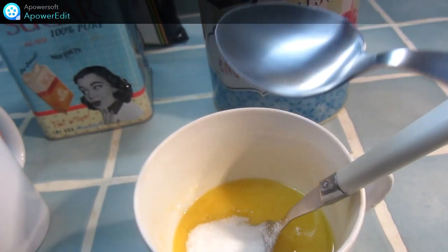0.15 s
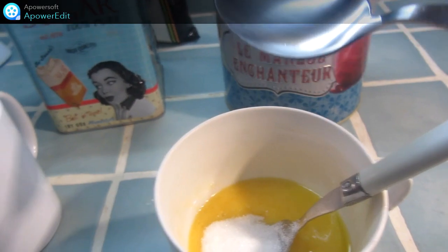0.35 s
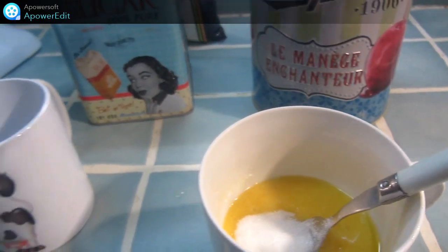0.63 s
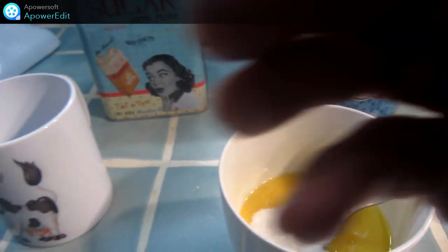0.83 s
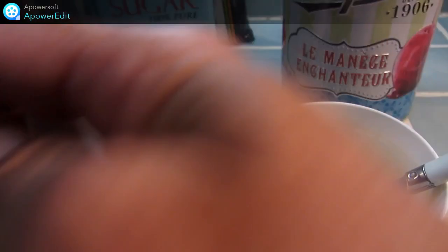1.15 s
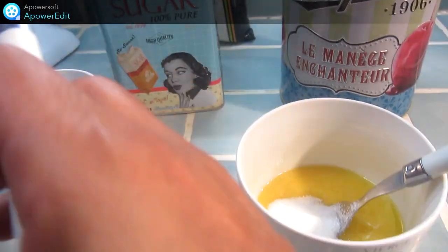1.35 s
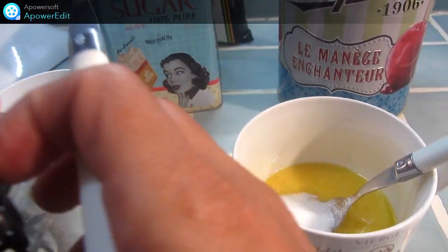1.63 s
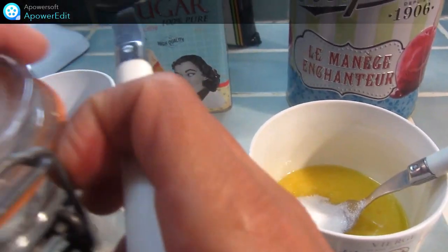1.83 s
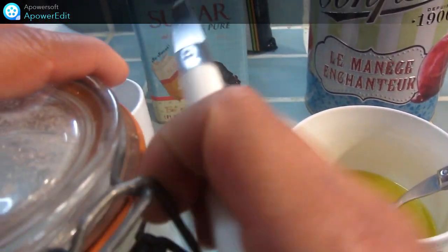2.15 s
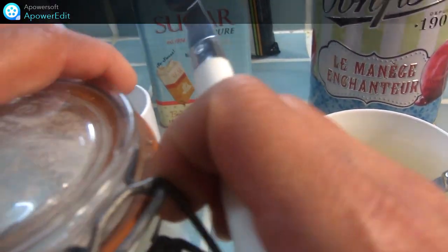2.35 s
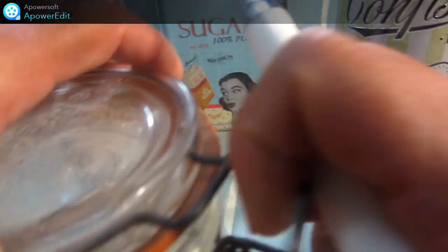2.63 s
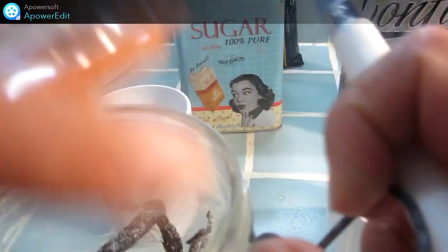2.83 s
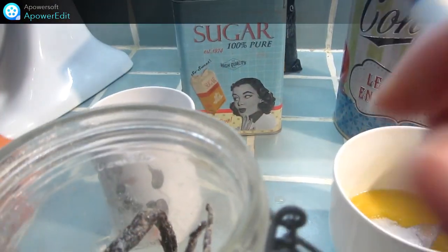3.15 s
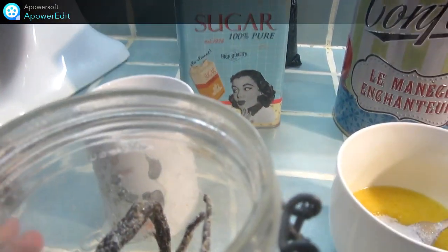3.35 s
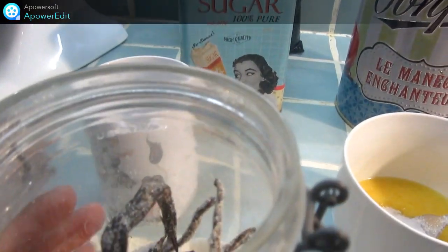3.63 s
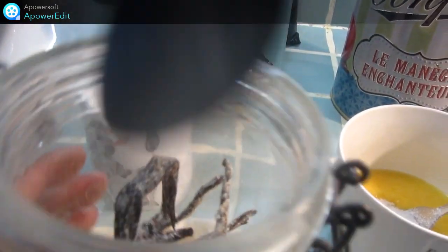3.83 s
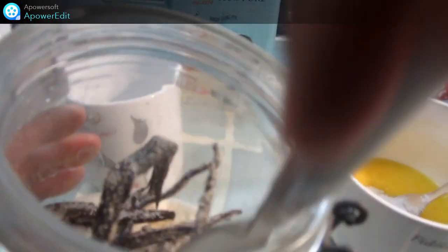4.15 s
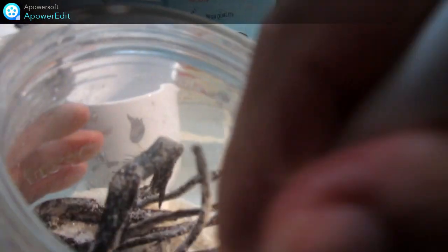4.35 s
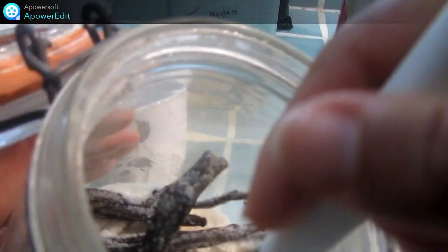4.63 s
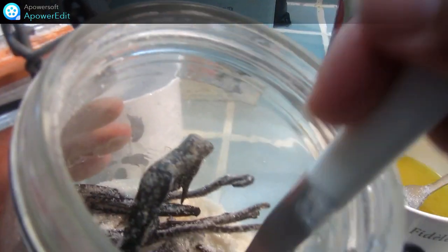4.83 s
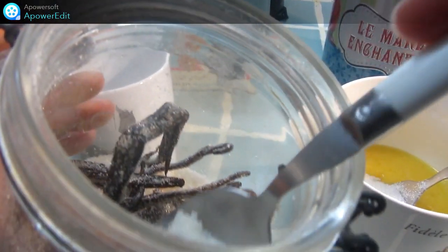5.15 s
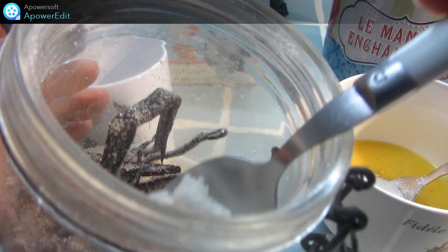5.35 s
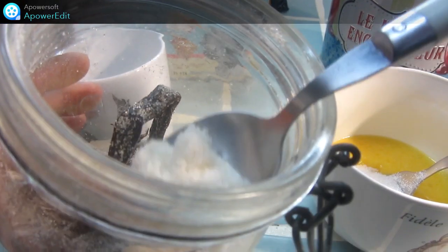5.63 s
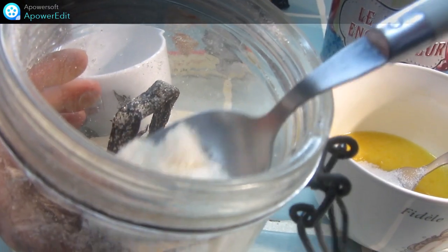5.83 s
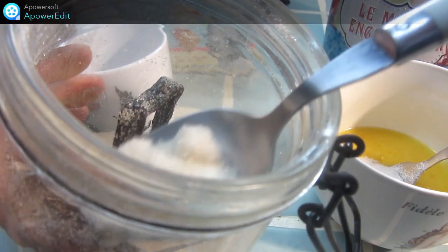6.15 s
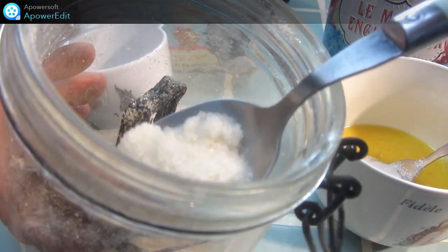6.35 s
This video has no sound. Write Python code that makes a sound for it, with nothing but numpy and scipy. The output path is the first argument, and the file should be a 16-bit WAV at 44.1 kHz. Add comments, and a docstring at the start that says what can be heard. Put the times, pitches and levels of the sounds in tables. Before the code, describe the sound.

Close kitchen handling: hollow glass thuds, a snapping wire clasp, jingling hinge, steel spoon crunching through sugar, four bright taps on the rim.

```python
"""A tiled kitchen, close to the microphone: a glass sugar jar is handled, its wire clasp snaps open, the hinged
lid swings back and knocks on the glass. A steel spoon clinks in, digs through the sugar and raps the rim.
Hard contacts are a crack, a noise cloud and ringing modes; rubs, hisses, grit and crunches are random slips
through colour filters. A small hard room echoes them, over still air and two faint hum tones that beat."""
import sys
import numpy as np
from scipy import signal
from scipy.fft import rfft, irfft
from scipy.io import wavfile

SR = 44100
rng = np.random.default_rng(int(sys.argv[2]) if len(sys.argv) > 2 else 0)


def wav_out(sig):
    """Save sig, one row per channel (or a flat mono array), as 16-bit PCM at SR to the path in sys.argv[1]."""
    wavfile.write(sys.argv[1], SR, np.round(np.clip(np.atleast_2d(sig).T, -1, 1) * 32767).astype(np.int16))


N = 285768
TIME = np.arange(N) / SR

# ringing modes of the wire clasp, also heard in the light ticks: [f/Hz, relative level/dB, t60/s]
CLASP_RING = [(865, 0.5, 0.2), (2705, -2, 0.059), (4400, 1.5, 0.023), (5450, -27.5, .035),
              (6120, 0.5, 0.043), (7070, -6.5, .05), (8900, -14.5, 0.042)]
# blows of the hinge wire: [t/s, relative level/dB, brightness/(dB per octave), left minus right/dB]
HINGE_BLOWS = [(3.149, -37.5, -3, -2), (3.157, -39, -0.5, -2), (3.1841, -18, -0.5, 0.5),
               (3.193, -13, -10, 6.5), (3.194, -8, 1.5, -3.5), (3.208, -22.5, -5, -1.5),
               (3.223, -19.5, 0.5, 1.5), (3.342, -20.5, -1, -1.5)]
# colour of the hinge wire's contact: [f/Hz, level/dB]
HINGE_SPECTRUM = [(240, -42.5), (400, -11.5), (588, -17.5), (1040, -34.5), (1790, 0), (2750, -18.5),
                  (3020, -7.5), (3810, -13.5), (4440, 3), (5190, -3.5), (6340, -0.5), (6950, -6),
                  (9470, -5.5), (16000, -27)]


def undb(db):
    """Decibels to gain."""
    return 10 ** (np.asarray(db) / 20)


def unit(x):
    """Scale to rms 1."""
    return x / np.sqrt(np.mean(x ** 2) + 1e-20)


def pan(db):
    """Left and right gains for a level difference (left minus right, dB), at constant power."""
    gains = undb(np.array([[db], [-db]]).reshape(2, -1) / 2)
    return gains / np.sqrt(np.mean(gains ** 2, axis=0))


def pair(size, spread):
    """Stereo noise with a shared part; spread is the side share."""
    mid, side = rng.standard_normal((2, size))
    return unit(np.array([mid + spread * side, mid - spread * side]))


def colour(x, points, tilt_db=0, size=4096):
    """Causal minimum-phase filter through (Hz, dB) points, tilted in dB per octave about 2 kHz."""
    hz, db = np.transpose(points)
    octave = np.log2(np.maximum(np.arange(size // 2 + 1) * SR / size, 1))
    tilt = tilt_db * np.clip(octave - 11, -4, 3)
    gain_db = np.interp(octave, np.log2(hz), db) + tilt
    # folding the cepstrum forward makes the response causal
    cepstrum = irfft(np.log(undb(gain_db)))
    cepstrum[1:size // 2] *= 2
    cepstrum[size // 2 + 1:] = 0
    response = irfft(np.exp(rfft(cepstrum)))
    return signal.fftconvolve(x, response[None], axes=1)[:, :x.shape[1]]


def fade(t, t60):
    """Exponential decay by 60 dB in t60 seconds."""
    return np.exp(-np.log(1000) * t / t60)


def walk(rate):
    """Smooth random wandering, spread near 1, with rate turning points per second."""
    knots = rng.standard_normal(2048)
    return np.interp(TIME * rate, np.arange(len(knots)), knots)


def swell(s, db, rise, hold, fall):
    """Gain of one movement: it grows by 60 dB over rise up to s, holds, and dies by 60 dB over fall."""
    early = np.maximum(s - TIME, 0)
    late = np.maximum(TIME - s - hold, 0)
    return undb(db - 60 * np.minimum(early / rise + late / fall, 2))


def grains(rate, scatter_db, spread):
    """Random tiny slips of unequal size, rate per second on average."""
    chance = rng.random(N)
    size = np.minimum(rng.exponential(size=N), 4)
    return unit(pair(N, spread) * (chance < rate / SR) * undb(scatter_db * size))


def sized(x):
    """Scale each channel to rms 1 over its first 8 ms."""
    attack = int(.008 * SR)
    return x / np.sqrt(np.mean(x[:, :attack] ** 2, axis=1, keepdims=True))


def strike(blows, points, modes, level_db, crack_db, ring_db, clatter_t60, spread, port_phase):
    """Each blow is a crack, a dense cloud of short-lived noise and a few lasting modes."""
    out, t = np.zeros((2, N + SR)), np.arange(SR // 2) / SR
    for s, db, bright_db, pan_db in blows:
        cloud = sized(colour(pair(len(t), spread) * fade(t, clatter_t60), points, bright_db))
        click = np.array([t == 0, t == 0]) * 1.
        crack = sized(colour(click, points, bright_db))
        ring = 0
        for hz, mode_db, t60 in modes:
            # the place of contact changes how strongly a mode rings; the two ports hear it out of step
            weight, turn = rng.standard_normal(2)
            lead = np.array([[1], [-1]]) * (port_phase + spread * turn / 2) / 2
            build_up = 1 - np.exp(-(2 * hz * t) ** 2)  # a mode builds up over its first cycle
            tone = np.sin(2 * np.pi * hz * t + lead)
            ring = ring + undb(mode_db + weight) * build_up * fade(t, t60) * tone
        blow = sized(cloud + undb(crack_db) * crack + undb(ring_db) * sized(ring))
        start = int(s * SR)
        out[:, start:start + len(t)] += undb(db + level_db) * pan(pan_db) * blow
    return out[:, :N]


def background():
    """Still kitchen air; an appliance motor beats slowly against the mains hum."""
    # colour of the kitchen air: [f/Hz, level/dB]
    air_colour = [(15, -61), (25, -26.5), (48, -12.5), (76, -2.5), (102, 5.5), (195, -8.5), (373, -6.5),
                  (516, -14), (624, -11.5), (1160, -20.5), (2840, -27), (4140, -35.5), (6560, -29.5),
                  (8830, -37), (16000, -50)]
    motor_hz, mains_hz, lull_s = 98.62, 100.01, .13  # the first lull of the beat falls at lull_s
    motor_db, mains_db = -59.5, -57.5  # levels at the start
    fading_db_per_s = 0.5  # the hum slowly grows fainter

    def tone(hz):
        return np.sqrt(2) * np.sin(2 * np.pi * hz * (TIME - lull_s))

    beat = undb(motor_db) * tone(motor_hz) - undb(mains_db) * tone(mains_hz)
    hum = beat * undb(-fading_db_per_s * TIME)
    air = unit(colour(pair(N, spread=1.0), air_colour)) * undb(-55.5 + 0.15 * walk(1.7))
    return air + pan(-3.0) * hum


def hands():
    """Fingers stick and slip on the jar: a hollow rumble set by the lid's state, a dry rub above it."""
    # finger strokes: [t/s, relative pressure level/dB, rise/s, hold/s, fall/s,
    # relative skin friction level/dB, left minus right/dB]
    strokes = [(0.757, -58, .35, 0.89, 0.42, -64.5, -1.5), (0.865, -28.5, 0.14, 0.029, 0.21, -43.5, 1),
               (1.687, -35.5, .04, 0.0087, 0.52, -48.5, -0.5), (1.918, -55.5, 0.46, 0.25, 0.65, -61, 0),
               (2.322, -39, 0.029, .01, 0.11, -56, 1), (2.808, -33, 0.07, 0.0061, 0.2, -44, 1),
               (2.9, -40.5, .2, 0.026, 0.41, -46.5, -1), (3.035, -46, .05, 0.0087, 0.43, -66, 4),
               (3.22, -39.5, 0.53, 0.0093, 0.33, -44, -1.5), (3.322, -47, 0.09, .01, 0.61, -54.5, -2),
               (3.62, -38, 0.12, 0.067, 0.48, -45, -3), (3.746, -46, 0.14, 0.0088, 0.096, -43, 0),
               (3.868, -29, 0.23, 0.013, 0.18, -46.5, -2.5), (3.961, -32, 0.28, 0.012, 0.26, -40, -0.5),
               (4.033, -30.5, 0.23, 0.061, 0.06, -50.5, -0.5), (4.445, -49.5, 0.58, 0.17, 0.4, -61.5, -0.5),
               (4.712, -38.5, 0.21, 0.016, 0.12, -52, -3), (4.998, -36, 0.63, 0.039, 0.34, -50.5, -1.5),
               (5.083, -34.5, 0.094, 0.021, 0.14, -51.5, -1), (5.181, -37, 0.23, 0.029, 0.84, -52, -0.5),
               (5.652, -46.5, 0.035, 0.0056, 0.077, -70, -4)]
    # skin rubbing on glass: [f/Hz, level/dB]
    skin_colour = [(290, -31), (500, 0), (585, 1), (622, -23), (949, -4), (1350, -12.5), (1820, -12),
                   (3220, -23), (5100, -31.5), (5620, -27.5), (9000, -37.5), (11700, -70), (19800, -120)]
    # hollow colour of the jar shut on the counter, with the lid swinging, open in the hand: [f/Hz, level/dB]
    shut_colour = [(35, -53), (60, -20), (87, -2), (204, 6), (296, 7), (359, 8), (403, -5.5), (592, -1),
                   (777, -11), (900, -2), (1170, -44.5), (1980, -120)]
    swinging_colour = [(35, -37), (60, -21.5), (168, -9), (226, -8), (321, -1), (389, -13), (466, -0.5),
                       (559, -15.5), (633, -19.5), (900, -20), (1170, -42), (1980, -120)]
    held_colour = [(35, -22), (60, -26), (118, -1), (199, 3.5), (265, 0), (321, 10.5), (398, -9), (461, 0),
                   (572, -9.5), (633, -18), (900, -14), (1170, -33.5), (1980, -120)]
    unlatched_s, lifted_s = 2.7, 3.82  # the lid comes free, then the open jar is lifted

    slips = walk(70)
    skin = grains(rate=2500, scatter_db=-1.5, spread=0.59)
    rub = unit(colour(skin, skin_colour)) * undb(2.0 * slips)
    friction = grains(rate=1200, scatter_db=1.0, spread=0.32)
    unsteady = undb(-1.5 + 2.5 * slips)
    shut = unit(colour(friction, shut_colour)) * unsteady
    swinging = unit(colour(friction, swinging_colour)) * unsteady
    held = unit(colour(friction, held_colour)) * unsteady
    out = 0
    for s, press_db, rise, hold, fall, rub_db, pan_db in strokes:
        rumble = shut if s < unlatched_s else swinging if s < lifted_s else held
        stroke = rumble + rub * undb(rub_db - press_db)
        out = out + pan(pan_db) * swell(s, press_db, rise, hold, fall) * stroke
    return out


def fine_hisses():
    """Fine dry hisses of many tiny slips; sparser crunches among them also ring the glass wall."""
    # fingers brushing the jar, later sugar sliding: [t/s, relative level/dB, rise/s, hold/s, fall/s]
    brushes = [(0.834, -64, 0.36, .01, 1.3), (1.405, -64.5, 0.033, 0.011, 1), (1.66, -69, 0.17, 0.35, 0.32),
               (1.93, -62, 0.1, 0.0045, 0.058), (3.872, -47, 0.096, 0.0087, 0.093),
               (3.967, -45.5, 0.078, 0.0065, 0.04), (4.182, -49.5, .05, 0.05, 0.1),
               (4.324, -47.5, 0.032, 0.0047, 0.91), (4.569, -43, 0.19, 0.013, 0.52),
               (4.766, -62.5, .06, 0.057, 0.9), (4.976, -61.5, 0.23, 0.14, .3),
               (5.2, -67.5, 0.087, .12, 0.25), (5.365, -61.5, .03, .05, 0.91)]
    # colour of the hiss: [f/Hz, level/dB]
    hiss_colour = [(710, -29), (1200, -17), (1830, -7), (2400, -10), (3250, -2.5), (3660, -9), (5780, -4.5),
                   (8910, -6.5), (13200, -21.5), (15000, -20.5), (16000, -22)]
    # the buried spoon keeps the wall ringing faintly until lifted out: [t/s, level/dB, rise/s, hold/s, fall/s]
    dig = (4.4, -62, .2, .9, .45)
    wall_hz, wall_q = 1781, 68  # lowest ring of the glass wall and its quality factor

    hiss = unit(colour(grains(rate=4500, scatter_db=1.5, spread=0.35), hiss_colour))
    crunch = grains(rate=85, scatter_db=1, spread=0.53)
    peak_b, peak_a = signal.iirpeak(wall_hz, wall_q, fs=SR)
    wall = unit(signal.lfilter(peak_b, peak_a, crunch))
    flow = sum(swell(*brush) for brush in brushes)
    texture = hiss + undb(-9.0) * unit(colour(crunch, hiss_colour))
    uneven = undb(-1.0 + 3.0 * walk(45))
    return flow * texture * uneven + swell(*dig) * wall


def ticks():
    """Fingers and wire tick lightly: short noise clouds with a weak ring of the clasp's modes."""
    # light ticks: [t/s, relative level/dB, brightness/(dB per octave), left minus right/dB]
    tick_blows = [(1.301, -33, 1, 0), (1.36, -37.5, -2, -1), (1.403, -33, 3, -0.5), (1.424, -34.5, -3, 0),
                  (2.441, -35, -0.5, -5), (2.483, -36, 2, 5), (2.498, -33, 3, -1), (3.911, -30, -1, 2),
                  (3.956, -20.5, -6.5, 1)]
    # colour of the contact: [f/Hz, level/dB]
    tick_colour = [(240, -9), (400, 7.5), (880, 4), (1370, 1.5), (2060, 3), (3390, -14), (6510, -15.5),
                   (15000, -37)]
    return strike(tick_blows, tick_colour, CLASP_RING, level_db=-7.5, crack_db=-8, ring_db=-24.0,
                  clatter_t60=0.024, spread=0.7, port_phase=0)


def drag(judder_hz=143):
    """The jar's foot judders over the tiles: glass catches and lets go, a burst of grit with every slip."""
    # one drag just after the first bump: [t/s, relative level/dB, rise/s, hold/s, fall/s]
    movement = (1.708, -36, .06, .066, .15)
    # grit between glass and tile: [f/Hz, level/dB]
    grit_colour = [(60, -6.5), (145, 3), (370, 0), (520, -22), (900, -14), (1250, -7), (1650, -16),
                   (2250, -8.5), (2850, -17), (4100, -25), (5000, -42), (9000, -68)]
    phase = np.cumsum(judder_hz * (1 + 0.065 * walk(60))) / SR  # in cycles
    burst = np.exp(-(phase % 1) / .5)
    slips = grains(rate=9000, scatter_db=0, spread=.5) * burst
    grit = undb(-2.5) * unit(colour(slips, grit_colour))
    judder = undb(1) * np.sin(2 * np.pi * phase)
    return swell(*movement) * (grit + judder)


def thuds():
    """Soft bumps on jar and counter sound the jar's air at a hollow pitch, with a counter resonance."""
    # bumps: [t/s, relative level/dB, brightness/(dB per octave), left minus right/dB, hollow pitch f/Hz]
    bumps = [(1.666, -18, 1, -4.5, 141), (1.943, -34, -12.5, -6.5, 139), (2.165, -13.5, 0, -3.5, 386.5),
             (2.501, -26, -3.5, -6, 334), (2.527, -21.5, 1, 2.5, 461), (2.528, -11.5, -0.5, 1.5, 371),
             (2.537, -18, 3, 0, 274), (2.614, -29.5, 3, -3.5, 122), (2.816, -25.5, 4.5, -5, 306),
             (3.157, -32, 9, 12, 516), (3.195, -24.5, 4, 1, 502), (3.519, -20.5, 1, 2, 457),
             (3.616, -23.5, 9, 11, 462), (3.688, -21.5, 4, 4, 458), (3.913, -19, 1.5, 3, 135),
             (3.956, -18.5, 2.5, -3, 334), (4.033, -19, 2, 1, 181), (4.267, -20.5, 4.5, -1.5, 542),
             (4.713, -35.5, -0.5, 6, 196), (5.094, -24, -9, -4, 300), (5.111, -36, -7, 1, 245),
             (5.233, -26, -7, 3, 229)]
    # colour of the contact: [f/Hz, level/dB]
    thud_colour = [(41, -27), (70, -14), (284, 4.5), (420, 0.5), (508, 1), (663, -9), (1760, -24),
                   (2020, -36), (2190, -31.5), (3000, -40), (3900, -71.5), (6600, -120)]
    # counter resonance: [f/Hz, relative level/dB, t60/s]
    counter_mode = (140, -15, 0.3)
    hollow_t60 = 0.097  # s
    out = 0
    for *blow, hz in bumps:
        modes = [(hz, 0, hollow_t60), counter_mode]
        out = out + strike([blow], thud_colour, modes, level_db=-8.5, crack_db=-1, ring_db=3.0,
                           clatter_t60=0.12, spread=0.59, port_phase=0.17)
    return out


def clasp():
    """The wire clasp snaps: a short clatter over the ringing modes of the wire."""
    # snaps: [t/s, relative level/dB, brightness/(dB per octave), left minus right/dB]
    snaps = [(2.2120, -37, -4, 2), (2.2303, -5.5, -5, 0.8), (2.2333, -8.5, 2.5, -3),
             (2.4885, -29, -5.5, -3.5), (2.5150, -22, -3, 2), (2.5292, -13.5, -4.5, -2.4),
             (2.5600, -23.5, -2, 1), (2.5632, -8, 1, -3), (2.5650, -14.5, 0, 11.5),
             (2.8598, -39.5, -0.5, -4), (3.0873, -41, -0.5, 4.6)]
    # colour of the contact: [f/Hz, level/dB]
    clasp_colour = [(120, -49), (200, -7.5), (851, -4), (1350, -6), (1620, 0), (2750, 1.5), (3620, -5),
                    (4600, -1.5), (4860, -2.5), (5230, -2.5), (9400, -7.5), (12200, -23.5), (14300, -21),
                    (16000, -32)]
    return strike(snaps, clasp_colour, CLASP_RING, level_db=-12.0, crack_db=-8.0, ring_db=-12,
                  clatter_t60=0.021, spread=.4, port_phase=.3)


def crunching_bed():
    """A faint, coarse crunching bed under the handling and digging: sparse slips of very unequal size."""
    # its one long swell: [t/s, relative level/dB, rise/s, hold/s, fall/s]
    bed = (3.5, -64, 0.6, 1.7, 0.5)
    # colour of the crunching: [f/Hz, level/dB]
    crunch_colour = [(500, -22.5), (1000, 1.5), (1400, -5.5), (1850, 13), (2400, 0.5), (3200, -11),
                     (5000, -23), (9000, -21.5)]
    crunches = unit(colour(grains(rate=1500, scatter_db=7.5, spread=0.75), crunch_colour))
    return swell(*bed) * crunches * undb(2 * walk(55))


def hinge():
    """The hinge wire jingles: each blow rings many high modes of the wire."""
    # ringing modes of the wire: [f/Hz, relative level/dB, t60/s]
    wire_modes = [(1730, -0.5, 0.045), (4140, -13.5, .08), (5000, -12, 0.06), (5600, -0.5, 0.053),
                  (6740, -5, 0.11), (6800, -2, .08), (7300, -13, 0.1), (7800, -9.5, 0.077), (9140, -3, .09),
                  (10370, -18, .13), (13100, -12.5, 0.061), (14100, -14, 0.14)]
    return strike(HINGE_BLOWS, HINGE_SPECTRUM, wire_modes, level_db=-7.0, crack_db=-28, ring_db=-9.5,
                  clatter_t60=0.027, spread=0.66, port_phase=0.4)


def rattle(level_db=-22, t60=0.23):
    """The loose hinge wire chatters on after each blow in random small contacts that die away."""
    energy = 0
    for s, db, _, _ in HINGE_BLOWS:
        energy = energy + ((TIME >= s) * undb(db) * fade(np.abs(TIME - s), t60)) ** 2
    chatter = unit(colour(grains(rate=430, scatter_db=4.5, spread=0.99), HINGE_SPECTRUM))
    return chatter * np.sqrt(energy) * undb(level_db)


def lid():
    """The heavy glass lid touches, then lands against the jar, ringing its modes."""
    # contacts: [t/s, relative level/dB, brightness/(dB per octave), left minus right/dB]
    landings = [(3.5042, -27.5, 6, 2), (3.5192, -5, 0.5, -2)]
    # colour of the contact: [f/Hz, level/dB]
    lid_colour = [(180, -33), (330, -17.5), (950, -10), (1300, -18.5), (1650, 7.5), (1900, 7), (2250, 1),
                  (2700, -8), (3500, -23.5), (4500, -14.5), (6200, -18.5), (7500, -31), (9500, -26.5),
                  (15000, -50)]
    # ringing modes: [f/Hz, relative level/dB, t60/s]
    lid_modes = [(1680, -24, 0.05), (1960, 6.5, 0.068), (1990, -2, 0.15), (2470, -4, 0.091),
                 (2940, -3.5, 0.14)]
    return strike(landings, lid_colour, lid_modes, level_db=-8.0, crack_db=-2.5, ring_db=-12.0,
                  clatter_t60=0.057, spread=0.53, port_phase=1.4)


def spoon():
    """The spoon clinks against the neck and rings, then raps the rim and rings that."""
    # clinks in the neck, raps on the rim:
    # [t/s, relative level/dB, brightness/(dB per octave), left minus right/dB]
    neck_blows = [(4.116, -13, 2.5, -2), (4.152, -18.5, 4.5, -5), (4.1608, -31, 1, 12),
                  (4.2584, -25.5, 5, -18), (4.2656, -19.5, 0.5, -4.5), (4.3178, -22, 0, -4.5),
                  (4.818, -45.5, 5, -10), (5.1255, -24.5, 1, -6), (5.227, -33, -2, -4),
                  (6.4352, -31, 4, -3)]
    rim_blows = [(5.8401, -14.5, 1.5, -1.5), (5.997, -12.5, 0, -2), (6.1317, -11.5, 2.5, -4),
                 (6.2762, -11, 2.5, -3)]
    # colour of each contact: [f/Hz, level/dB]
    clink_colour = [(290, 0), (500, -12), (1180, -14.5), (1790, 8), (2610, -4), (3200, 0.5), (3540, -11.5),
                    (4660, -8), (5710, -9.5), (6900, -17.5), (8960, -19), (12300, -36), (14700, -36),
                    (16000, -79)]
    tap_colour = [(120, -24), (200, -3.5), (500, -3.5), (800, -7), (1060, -46), (1400, -11.5), (1850, 9),
                  (2400, 3.5), (3000, -5.5), (4600, -10.5), (5700, -15), (6300, -14), (8500, -17),
                  (11500, -28), (15000, -41)]
    # ringing modes of the spoon and of the struck rim: [f/Hz, relative level/dB, t60/s]
    spoon_modes = [(1633, -17, 0.24), (1866, 19, 0.066), (1926, -14.5, 0.023), (3160, 18, 0.017),
                   (5100, -9, 0.025), (5820, 7, 0.062), (6360, 8.5, 0.028), (15300, -11, .06)]
    rim_modes = [(1730, -11, 0.3), (1835, 13.5, 0.092), (1856, -9, 0.35), (2260, -15, 0.054),
                 (3200, -25, .025), (4600, 6.5, 0.015), (6280, -3.5, 0.023)]
    clinks = strike(neck_blows, clink_colour, spoon_modes, level_db=-5.5, crack_db=-33, ring_db=-6.5,
                    clatter_t60=0.016, spread=0.7, port_phase=1.58)
    taps = strike(rim_blows, tap_colour, rim_modes, level_db=-4.5, crack_db=2, ring_db=8,
                  clatter_t60=0.036, spread=0.69, port_phase=1.92)
    return clinks + taps


def kitchen(dry, room_db, low_t60, high_t60, treble_db, split_hz):
    """Tiles return a dense echo; above split_hz it is softer and dies at its own rate."""
    t = np.arange(SR // 2) / SR
    noise = pair(len(t), spread=0.51)
    low = signal.sosfilt(signal.butter(2, split_hz, fs=SR, output="sos"), noise)
    high = signal.sosfilt(signal.butter(2, split_hz, "high", fs=SR, output="sos"), noise)
    onset = np.clip(t / 0.0018 - .4, 0, 1)  # the echo sets in over the first few milliseconds
    echo = (low * fade(t, low_t60) - undb(treble_db) * high * fade(t, high_t60)) * onset
    echo /= np.sqrt(np.sum(fade(t, low_t60) ** 2))
    return undb(room_db) * signal.fftconvolve(dry, echo, axes=1)[:, :N]


def scene():
    """Close sounds, one echo for the jar and another for the spoon, and the background."""
    contacts = ticks() + thuds() + clasp() + hinge() + rattle()
    handling = contacts + hands() + drag() + fine_hisses() + crunching_bed()
    knock, steel = lid(), spoon()
    jar_echo = kitchen(handling + undb(-0.5) * knock, room_db=-9.0, low_t60=0.5, high_t60=0.37,
                       treble_db=-6.5, split_hz=1030)
    spoon_echo = kitchen(steel, room_db=-6.0, low_t60=0.35, high_t60=0.41, treble_db=-12.0, split_hz=1230)
    return handling + knock + steel + jar_echo + spoon_echo + background()


def record(dry):
    """The microphone drops the deepest bass; the recorder rounds the sharpest peaks and cuts the top."""
    thin = signal.sosfilt(signal.butter(3, 52, "high", fs=SR, output="sos"), dry)
    rounded = .8 * np.tanh(thin / .8)
    return signal.sosfilt(signal.ellip(10, .2, 80, 16000, fs=SR, output="sos"), rounded)


dry = scene()
out = record(dry)
wav_out(out)
```